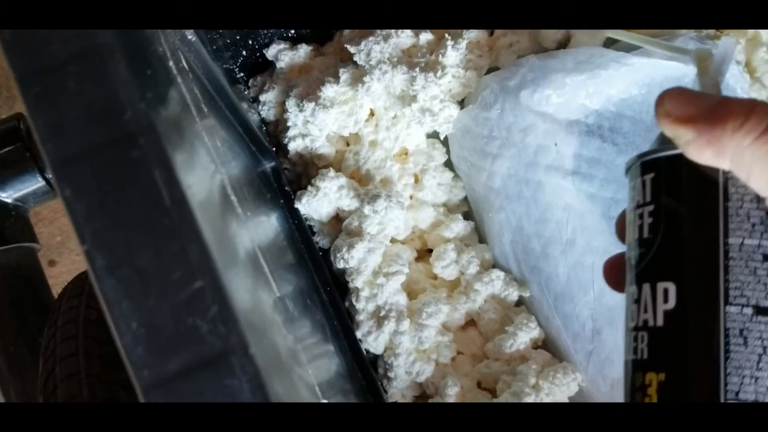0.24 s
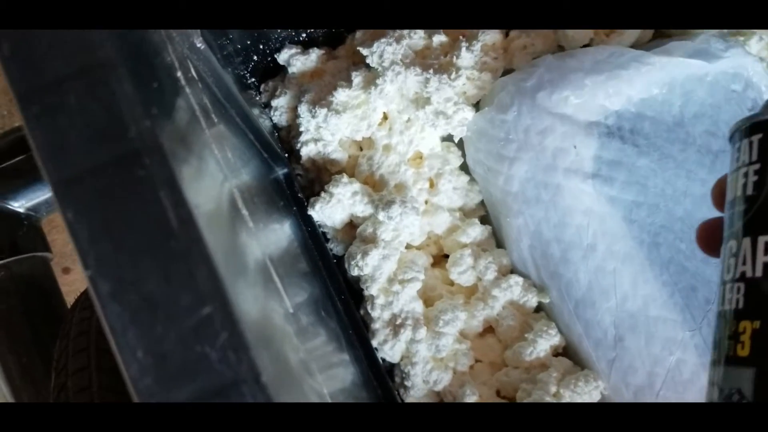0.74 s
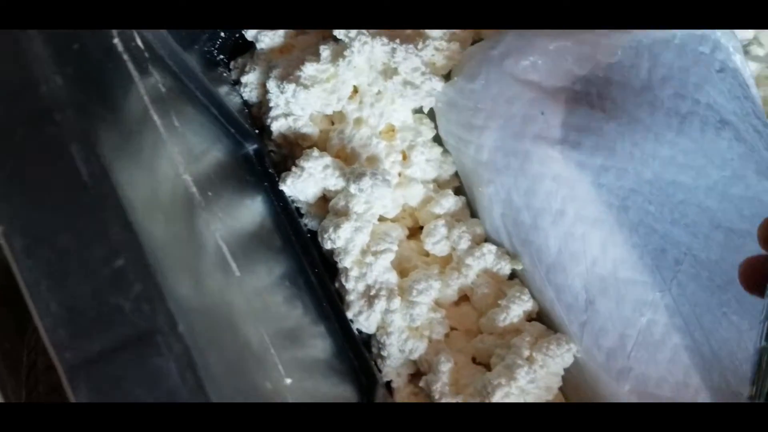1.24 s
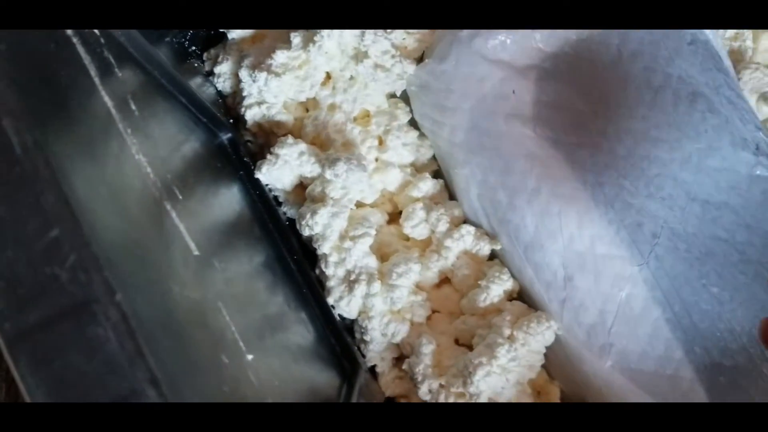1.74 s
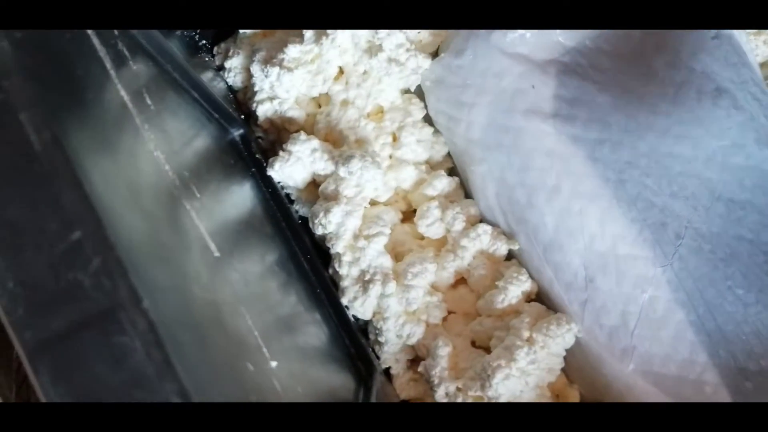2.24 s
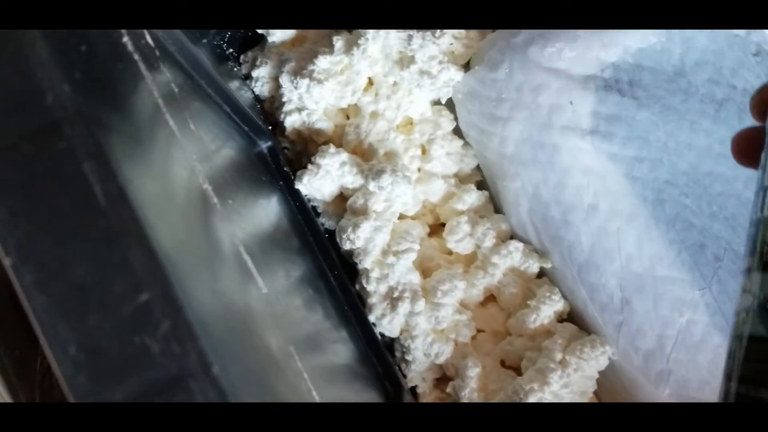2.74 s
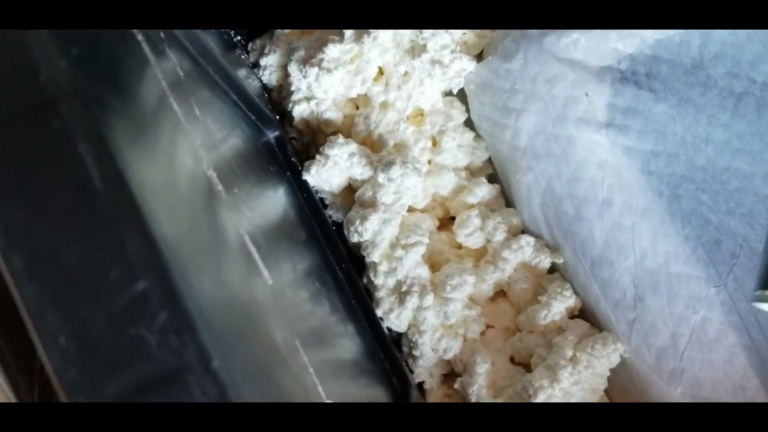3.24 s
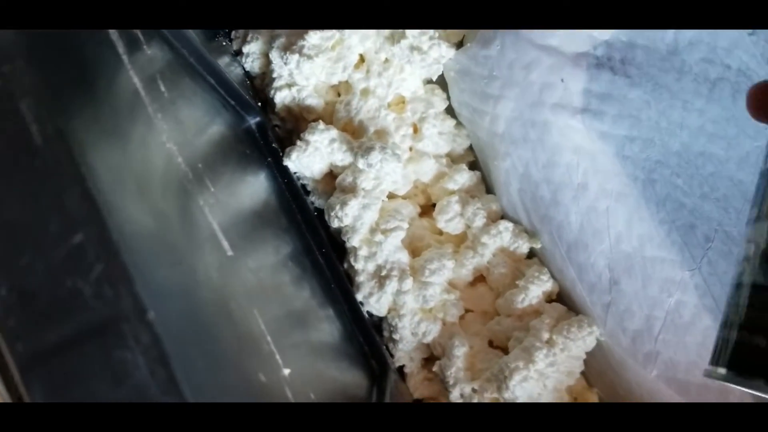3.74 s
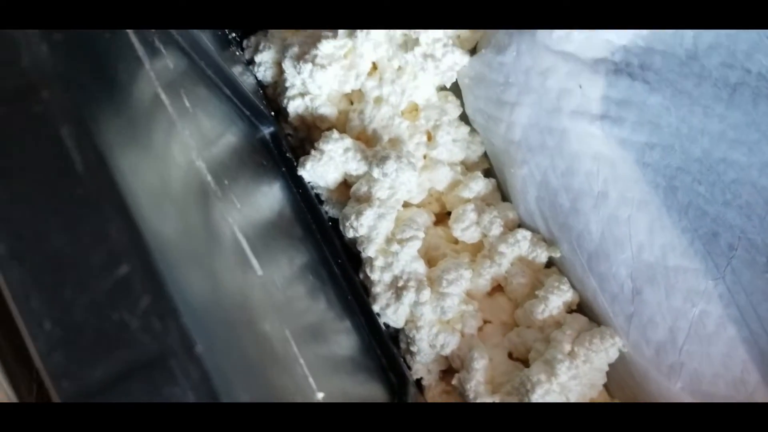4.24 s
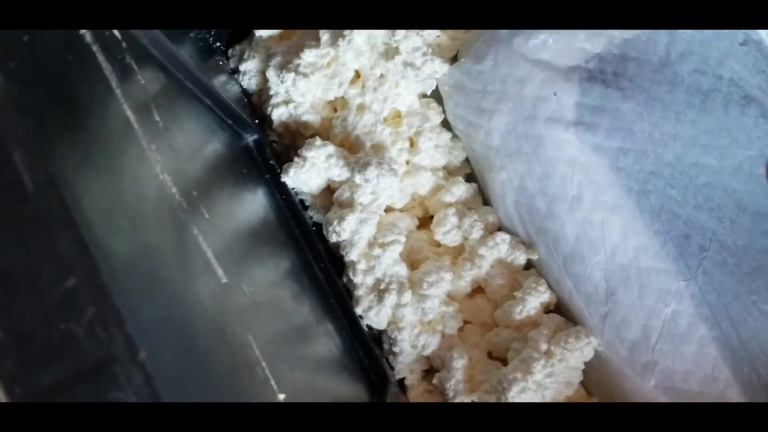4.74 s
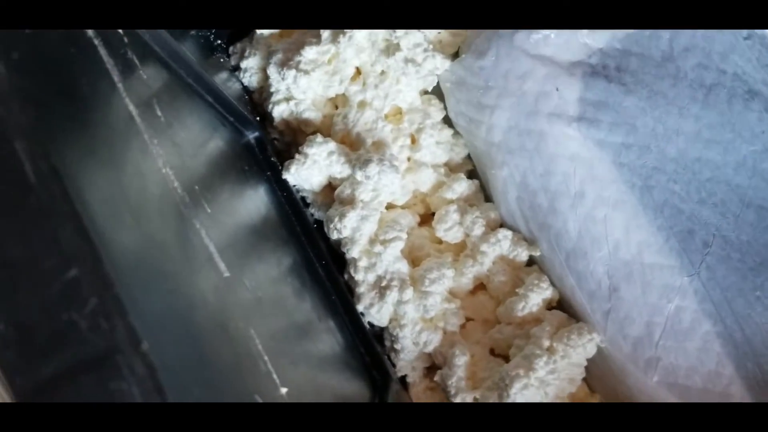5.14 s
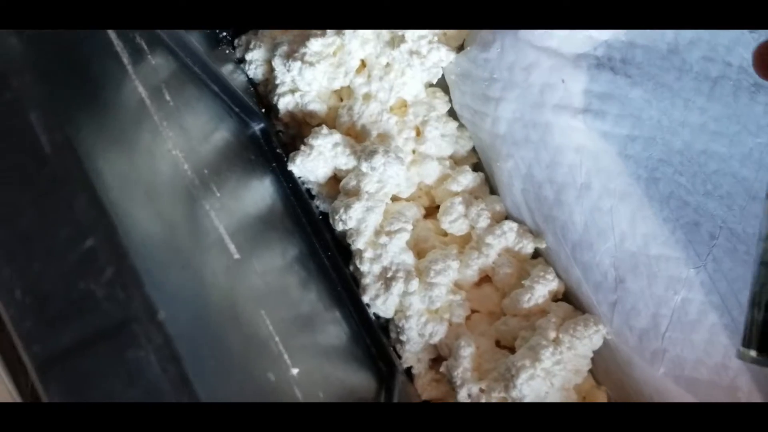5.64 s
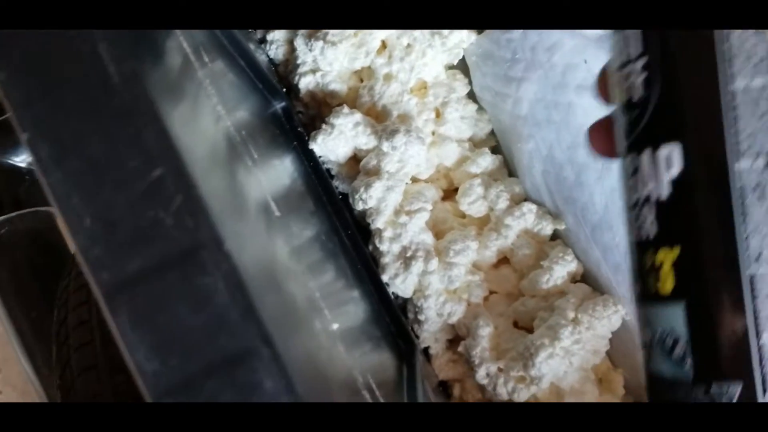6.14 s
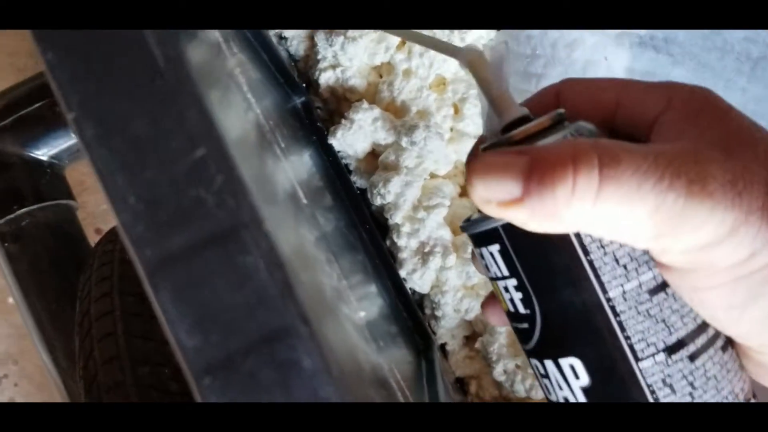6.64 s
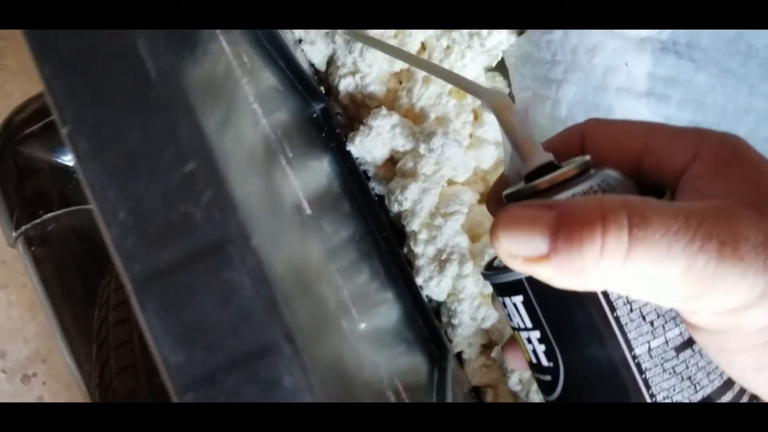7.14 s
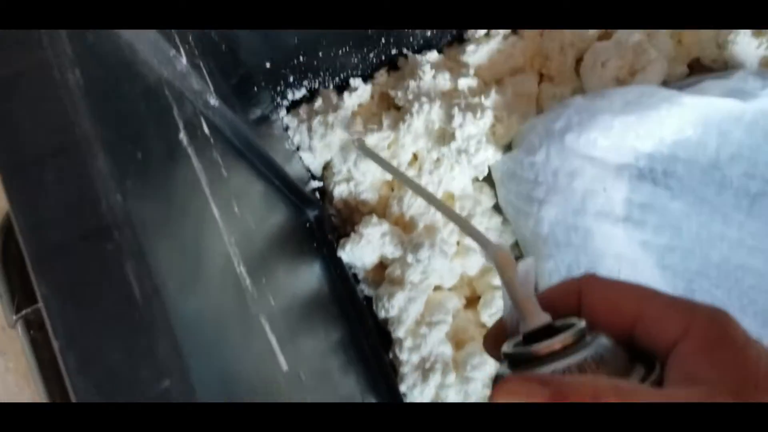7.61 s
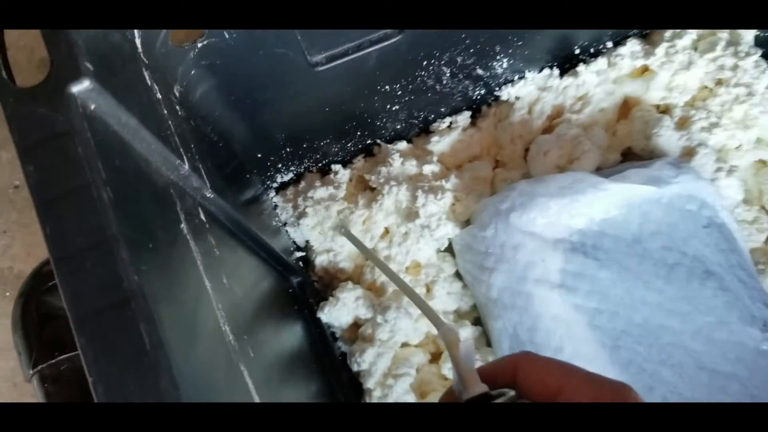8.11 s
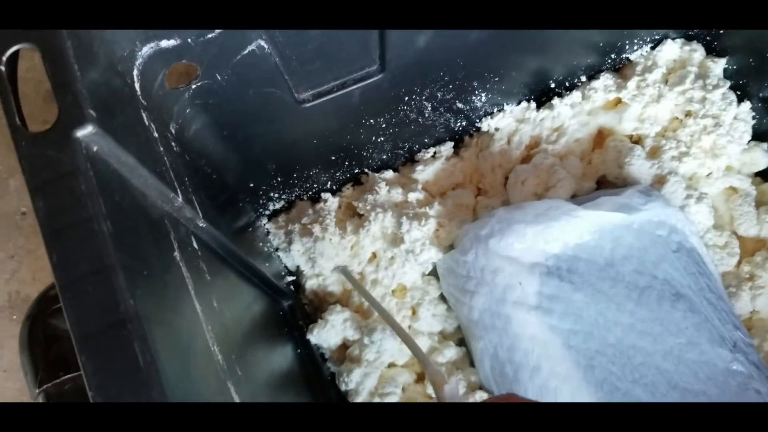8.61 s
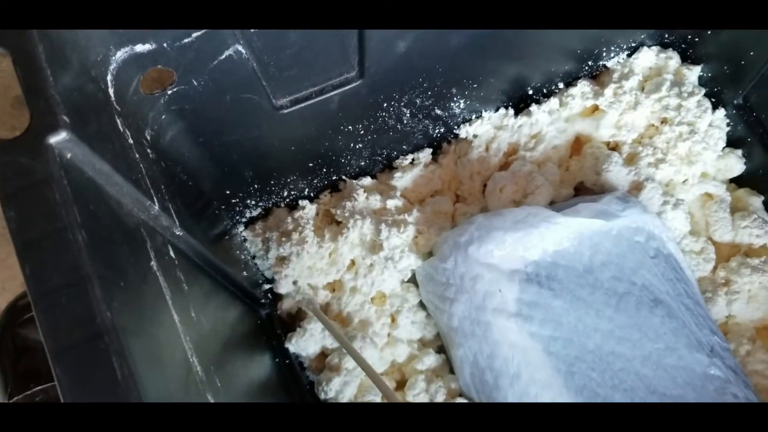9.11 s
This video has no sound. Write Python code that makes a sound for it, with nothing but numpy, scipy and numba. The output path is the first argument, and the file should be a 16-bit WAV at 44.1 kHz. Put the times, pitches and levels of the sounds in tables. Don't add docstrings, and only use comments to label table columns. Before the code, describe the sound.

Pressurised foam hisses from a thin straw close by, muffled and crackly at first, then brighter and more stuttering, over a faint workshop rumble.

```python
import sys
import numpy as np
from scipy import signal
from scipy.fft import rfft, irfft
from scipy.io import wavfile
from scipy.ndimage import uniform_filter1d, minimum_filter1d, map_coordinates
from numba import njit

SR = 44100
rng = np.random.default_rng(int(sys.argv[2]) if len(sys.argv) > 2 else 0)


def master_out(mix):
    frames = np.transpose(np.atleast_2d(mix))
    ceiling = np.clip(frames, -1, 1)
    pcm = np.round(ceiling * 32767).astype(np.int16)
    wavfile.write(sys.argv[1], SR, pcm)


def invert_db(x):
    u = np.asarray(x, float) / 20
    return 10 ** u


N = 413216


def in_time(rows):
    s, *columns = np.transpose(rows)
    return [np.interp(np.arange(N) / SR, s, column) for column in columns]


def rms_one(x):
    return x / np.sqrt(np.mean(x ** 2) + 1e-20)


def coloured(points, channels):
    hz = np.arange(N // 2 + 1) * SR / N + 1
    point_hz, point_db = np.transpose(points)
    gain = invert_db(np.interp(np.log(hz), np.log(point_hz), point_db))
    return hz, gain * rfft(rng.standard_normal((channels, N)))


def drift(rate):
    r = np.exp(-80 * np.pi * rate / SR)
    slow = signal.lfilter([1], [1, -2 * r, r * r], rng.standard_normal(N // 40 + 4002))
    slow = slow[4000:]
    return np.interp(np.arange(N) / 40, np.arange(len(slow)), rms_one(slow - slow.mean()))


def fade(clicks, seconds):
    return signal.lfilter([1], [1, -np.exp(-1 / (seconds * SR))], clicks + 1e-18)


def delayed(x, ms):
    return map_coordinates(x, [np.arange(N) - ms * SR / 1000], order=3, mode="mirror", prefilter=False)


@njit
def moving_peak(x, hz, r, sr):
    y = np.zeros(len(x))
    for i in range(2, len(x)):
        drive = (1 - r * r) / 2 * (x[i] - x[i - 2])
        y[i] = drive + 2 * r * np.cos(2 * np.pi * hz[i] / sr) * y[i - 1] - r * r * y[i - 2]
    return y


def resonate(x, hz, lift_db, width_hz):
    centre_hz = np.zeros(N) + hz
    return x + (invert_db(lift_db) - 1) * moving_peak(x, centre_hz, np.exp(-np.pi * width_hz / SR), SR)


def workshop():
    # (frequency [Hz], level [dB])
    rumble_colour = [(12, -54), (20, -26), (54, -14.5), (119, -9.5), (208, 7.5), (400, -0.5), (550, -69),
                     (920, -120)]
    # (time [s], hum level [dB])
    motor_level = [
        (1.3, -100),
        (1.45, -60),
        (3.3, -64),
        (3.5, -100),
    ]
    hz, noise = coloured(rumble_colour, channels=2)
    side_share = 0.18 * np.clip(hz / 350, .3, 1)
    mid, side = irfft(noise * [np.ones(len(hz)), side_share], N)
    hum_level = invert_db(in_time(motor_level)[0] + 0.59 * drift(4))
    motor_hz = 97.5 + 4.4 * drift(1.4)
    hum = hum_level * np.sin(2 * np.pi * np.cumsum(motor_hz) / SR)
    return invert_db(-44.5) * rms_one(mid + side * [[1], [-1]]) + np.sqrt(2) * hum


def walls(x, port):
    # (first, second, third echo lag [ms])
    room_lags_ms = [(7.3, 11.9, 17.1), (8.9, 13.7, 19.3)]
    thin = signal.sosfilt(signal.butter(2, 1200, "high", fs=SR, output="sos"), x)
    return invert_db(-16) * sum(delayed(thin, ms) * (-1) ** k for k, ms in enumerate(room_lags_ms[port]))


def paths(x, direct_ms):
    out = delayed(x, direct_ms)
    bright = signal.sosfilt(signal.butter(4, 2500, "high", fs=SR, output="sos"), x)
    for mean_ms in (.35, .62, 1.1, 2.3, 3.4, 5.2):
        lag_ms = direct_ms + mean_ms * (1 + 0.1227 * drift(0.898))
        out += 0.5 * rng.choice([-1, 1]) * delayed(bright, lag_ms)
    return out


def can_shade(x):
    # (time [s], centre [Hz], lift [dB])
    left_shade = [(0, 684, -16), (.5, 840, -8), (.9, 1080, 6), (1.2, 1300, 1), (2.5, 900, 3),
                  (2.8, 910, 0.5), (3.1, 1450, -1), (3.4, 1300, 2), (4.0, 900, 0.5), (4.35, 905, 3),
                  (4.7, 1000, -1), (5.5, 1000, 3), (5.75, 970, -10), (6.1, 735, -2.5), (6.3, 900, 1.5),
                  (6.6, 920, -1.5), (7.8, 1020, 1.5), (8.2, 1020, 1), (9.37, 1050, 0)]
    return resonate(x, *in_time(left_shade), width_hz=390)


def housing(left, right):
    # (time [s], centre [Hz], lift [dB])
    port_null = [(0, 1830, -8), (4.3, 1850, -7), (4.42, 2050, -22), (4.63, 2160, -20), (4.75, 1800, -12),
                 (5.35, 1820, -10), (5.55, 2200, -24), (5.7, 1850, -4), (6.4, 2000, -10), (6.55, 1940, -26),
                 (7.3, 1930, -26), (8.1, 1800, -18), (9.37, 1810, -12)]
    shared, apart = (left + right) / 2, (left - right) / 2
    shared = resonate(shared, *in_time(port_null), width_hz=280)
    case_hz, case_width_hz = 2244, 590
    shared = resonate(shared, case_hz, 2, case_width_hz)
    apart = resonate(apart, case_hz, -3, case_width_hz)
    return np.array([shared + apart, shared - apart])


def surges():
    # (time [s], lift [dB], half length [s])
    gas_surges = [(0.282, 1.5, 0.18), (0.46, -2.5, 0.08), (0.658, 5, 0.066), (0.91, 1, 0.061),
                  (1.043, -1.5, 0.027), (1.194, -2, 0.68), (1.437, 7, 0.041), (1.61, 4, 0.024),
                  (1.803, 3, 0.017), (1.998, -5.5, 0.035), (2.057, 2.5, 0.019), (2.373, 4.5, 0.085),
                  (2.65, 3.5, 0.043), (2.847, -3.5, 0.17), (3.107, -2.5, 0.071), (3.42, 1.5, 0.16),
                  (3.496, -3.5, 0.049), (3.723, 1, 0.032), (4.031, 2.5, 0.079), (4.195, -1.5, 0.026),
                  (4.588, 2, 0.12), (4.91, -2.5, 0.034), (5.08, 0, 0.13), (5.59, 1.5, 0.11),
                  (6.01, 0.5, 0.093), (6.668, -1, 0.025), (6.96, 0, 0.12), (7.235, 3, 0.67), (7.7, 1, 0.22),
                  (9.37, -14, 0.0062)]
    s, lift_db, half_s = np.transpose(gas_surges)
    coarse = np.arange(0, N + 100, 100) / SR
    bells = np.exp(-((coarse[:, None] - s) / half_s) ** 2)
    return np.interp(np.arange(N) / SR, coarse, bells @ lift_db)


def sputter(hiss_db):
    # (time [s], peak [dB], depth of the choke before it [dB])
    foam_slugs = [(0.132, -19, 2), (0.199, -5, -5), (0.2957, -15, 2), (0.3444, -7, -8), (0.4324, -5, -1),
                  (0.4658, -13, -3), (0.494, 0, 4), (0.5192, -12, -2), (0.622, -5, -3), (0.6679, -2, 1),
                  (0.814, -22, 4), (0.839, -8, 5), (0.8955, -20, 0), (1.037, -4, 0), (1.151, -19, 8),
                  (1.1842, -17, 3), (1.3423, -8, -1), (1.4082, -5, -6), (1.5988, -18, 1),
                  (1.7594, -12, 1), (1.7978, -8, 0), (2.0283, -9, -4), (2.129, -23, 6), (2.2124, -18, -1),
                  (2.2443, -10, 2), (2.3012, 1, -2), (2.3506, -11, 0), (2.413, -2, 2), (2.5262, -10, 2),
                  (2.5865, -12, -3), (2.6569, -5, -3), (2.834, -8, 4), (2.9786, 1.5, -7), (3.018, -20, 4),
                  (3.1113, -8, -3), (3.204, -4, 4), (3.291, 0, 4), (3.3543, -15, 3), (3.3907, -13, 1),
                  (3.4521, -8, -3), (3.5304, -3, -4), (3.694, 2, -1), (3.8, -15, 2), (3.9689, -14, -2),
                  (4.0387, -3, -5), (4.082, -4, -7), (4.2383, -13, 4), (4.308, -5, -6), (4.3371, -13, -3),
                  (4.5391, -15, 4), (4.6015, -10, -2), (4.6528, -9, -4), (4.696, -10, -1), (4.9552, -12, 2),
                  (5.0799, -12, 2), (5.1662, -10, -2), (5.192, 5.5, -2), (5.494, 2, -2), (5.53, -7, 3),
                  (5.6521, -14, 2), (5.683, -15.5, 2), (5.966, -2, 4), (6.0412, -7, 3), (6.069, -6, 7),
                  (6.102, -8, 2), (6.167, -9, -1), (6.2742, -10, 3), (6.3086, -11, 5), (6.343, -4, 12),
                  (6.516, -18, 7), (6.553, -9, -5), (6.6114, -22, 8), (6.729, -7, 9.5), (6.8154, -8, 3),
                  (6.9496, -16, 3), (7.0177, 0, 6), (7.0954, -15, 4), (7.147, -7, -2), (7.1821, -8, 1),
                  (7.226, 0, 4), (7.262, -9, -8), (7.299, -6, 4), (7.3477, -9, 2), (7.3742, -17, 6),
                  (7.448, -12, 6), (7.494, -4, 6), (7.537, -10, 12), (7.583, -20, 3), (7.6131, -16, 6),
                  (7.6595, -10, 9), (7.7172, -13, 8)]
    # (time [s], peak [dB], choke depth [dB])
    late_gasps = [(7.7889, -4, -2), (7.8123, -4, 11), (7.8587, -13, 4), (7.918, -4, 9), (7.973, 0, 4),
                  (8.0063, -4, 8), (8.0817, -19, 4), (8.108, -15, 7), (8.132, -13, 5), (8.153, -18, 6),
                  (8.2723, -22, 5), (8.307, -12, 5), (8.3361, -5, 5), (8.3905, -11, 5), (8.4104, -12, 2),
                  (8.426, -11, 16), (8.4653, -22, 10), (8.481, -22, 15), (8.508, -10, 7), (8.5277, -20, 12),
                  (8.562, -6, 25), (8.604, -18, 16), (8.6324, -15, 6), (8.649, -7, 12), (8.669, -9, 9),
                  (8.7437, -17, 8), (8.8011, -10, 5), (8.817, -2, -8), (8.86, -9, 10), (8.8879, -24, 2),
                  (8.908, -10, 10), (8.9472, -17, 19), (8.99, -8, 17), (9.015, -10, 10), (9.048, -16, 7),
                  (9.1106, -5, 11), (9.138, -6, 2), (9.1562, -13, 11), (9.197, -11, 4), (9.213, -15, 6),
                  (9.2356, -18, 4), (9.273, -18, 2), (9.323, -9, 32)]
    s, peak_db, choke_db = np.transpose(foam_slugs + late_gasps)
    emptying, chance = np.linspace(0.87, 1, N), rng.random((3, N))
    small = (chance[0] < 82 / SR) * emptying
    burst = small * 1.5 * (.5 + chance[1])
    choke = small * 0.5 * (.5 + chance[2])
    at = np.minimum((s * SR).astype(int), N - 1)
    crest_db, loudest_burst_db = 4.5, 8.5
    burst[at] = np.clip(peak_db - hiss_db[at] - crest_db, 0, loudest_burst_db)
    choke[at] = np.maximum(choke_db, 0)
    choke_s = .0042
    sag = fade(fade(choke[::-1], choke_s), choke_s)[::-1] * np.e / (choke_s * SR)
    flow = uniform_filter1d(fade(burst, 0.0044) - sag, size=190)
    flow = flow + .4 * uniform_filter1d(fade(burst, .001), size=45)
    flow = flow + 0.69 * drift(13) + 0.5 * emptying * drift(78) + 2.3 * drift(380)
    return flow - uniform_filter1d(flow, size=9000)


def cavities(x, buried, wall, surge_db):
    # (centre [Hz], lift far from wall [dB], lift near [dB], more when buried [dB], width [Hz])
    tray_rings = [
        (650, 3, 13.5, 2.5, 350),
        (1120, 4, 7.5, -7, 202),
        (1625, -10.5, 15, 7.5, 76),
    ]
    # (time [s], centre [Hz], lift [dB])
    foam_bounce = [(0, 650, -1.5), (.45, 855, -9.5), (.8, 930, -13), (1.4, 1120, -12), (1.8, 1070, -11.5),
                   (2.2, 1200, -15), (2.45, 1450, -13), (2.75, 1470, -12), (3.0, 950, 1), (4.3, 885, 1),
                   (4.6, 1210, -3), (5.0, 1450, -11), (5.6, 1370, -5), (6.15, 790, 1), (6.25, 2010, 2),
                   (6.55, 1820, -2.5), (7.1, 1700, -7.5), (8.1, 1810, 3), (9.37, 1830, 6)]
    # (time [s], centre [Hz], lift [dB])
    can_shadow = [(0, 2700, -15), (.6, 2870, -1), (.85, 2970, 7), (1.05, 3200, 10), (1.2, 2310, 8.5),
                  (1.4, 2320, 8.5), (1.65, 2120, 12), (1.8, 2220, 1), (2.1, 2600, 9), (2.5, 1980, -7),
                  (2.95, 2060, 11.5), (3.4, 2740, -5.5), (4.45, 2240, -8), (4.8, 3020, 9.5),
                  (5.4, 2300, -31), (5.9, 1890, 14), (6.08, 1600, 12.5), (6.27, 1190, 3.5),
                  (6.4, 2320, 7.5), (6.75, 3060, -11), (7.15, 2770, -16), (7.6, 2550, 0), (8.3, 2380, -14),
                  (9.37, 2650, -11)]
    # (time [s], centre [Hz], lift [dB])
    foam_pocket = [(0, 4100, 8.5), (.75, 4530, 5.5), (1.05, 3930, 1), (1.3, 4040, -5), (1.44, 4170, 1.5),
                   (1.6, 3700, -2), (1.8, 3700, 3), (2.2, 4470, 1.5), (2.5, 3780, 6), (2.85, 3170, 7),
                   (3.05, 3100, -4), (3.15, 6540, 4.5), (4.2, 5800, 9), (4.45, 3960, -1.5),
                   (5.2, 4770, 3.5), (5.7, 4160, 1), (5.95, 6750, 6.5), (6.749, 6460, 3.5),
                   (7.0, 4530, -0.5), (7.9, 3780, -3), (8.6, 4170, -2), (9.37, 4150, 2)]
    widths_hz = [670, 280, 930]
    for hz, far_db, near_db, sunk_db, width_hz in tray_rings:
        x = resonate(x, hz, far_db + (near_db - far_db) * wall + sunk_db * buried, width_hz)
    x = resonate(x, *in_time(foam_bounce), widths_hz[0])
    x = resonate(x, *in_time(can_shadow), widths_hz[1])
    pocket_hz, pocket_db = in_time(foam_pocket)
    return resonate(x, pocket_hz, pocket_db + surge_db, widths_hz[2])


def passing(x):
    # (time [s], centre [Hz],
    # lift [dB], half length [s])
    passing_tints = [(0.01, 1250, 8, 0.11), (0.01, 2630, 13, 0.043), (0.01, 5400, 11, 0.041),
                     (0.222, 6290, 6, 0.14), (0.493, 3700, 7, 0.18), (0.594, 1980, 8, 0.21),
                     (1.05, 4260, 14, 0.037), (1.174, 6460, 10, 0.38), (1.402, 4300, 4.5, 0.11),
                     (1.7, 3730, 9, 0.17), (1.72, 6290, 9, 0.2), (1.78, 2900, 3, 0.15), (2.264, 4040, 2.5, 0.15),
                     (2.314, 6450, 9, 0.044), (2.505, 3200, 8, 0.068), (2.79, 1900, 7, 0.18),
                     (2.803, 3580, 11, 0.1), (2.86, 6130, 6, 0.3), (2.91, 6840, 2, 0.056),
                     (3.046, 2750, 12, 0.046), (3.053, 3920, 13, 0.063), (3.275, 4000, 8, 0.13),
                     (3.463, 5000, 5, 0.25), (3.46, 6100, 15.5, 0.071), (3.65, 4030, 6, 0.24),
                     (3.812, 3340, 8.5, 0.059), (3.85, 3220, 3, 0.22), (3.868, 4520, 3.5, 0.14),
                     (4.24, 6840, 5, 0.25), (4.606, 4720, 7.5, 0.13), (4.719, 3230, 3.5, 0.3),
                     (5.2, 5840, 6, 0.069), (5.37, 3220, 5, 0.15), (5.715, 6670, 5.5, 0.41),
                     (5.722, 7300, 11, 0.16), (5.82, 3860, -13, 0.13), (6.223, 2630, 11, 0.089),
                     (6.332, 4720, 14.5, 0.033), (6.764, 7300, 11.5, 0.51), (6.93, 5780, 11, 0.21),
                     (7.022, 3700, 8, 0.19), (7.197, 5100, 6.5, 0.14), (7.71, 4100, -2, 0.11),
                     (7.94, 2900, 5.5, 0.2), (7.972, 3830, 7, 0.12), (8.36, 5430, 4, 0.07), (8.37, 4700, 6, 0.13),
                     (8.56, 4160, -7, 0.045), (9.07, 3530, 7.5, 0.073), (9.36, 3580, -3, 0.093),
                     (0.19, 3300, -7, 0.39), (0.19, 3750, -12, 0.093), (0.7, 3780, -12, 0.1),
               (0.914, 1580, -8, 0.13), (1.11, 5740, -8, 0.076), (1.59, 5000, -8, 0.2),
               (1.51, 1630, -7, 0.25), (1.55, 2780, -12, 0.12), (1.86, 4100, -15, 0.27),
               (2.1, 2840, -4.5, 0.084), (2.26, 5030, -8, 0.2), (2.325, 3330, -11, 0.24),
               (2.413, 6040, -10, 0.064), (2.68, 3960, -12, 0.19), (2.89, 4680, -1.5, 0.37),
               (3.47, 3040, -17, 0.049), (3.62, 5800, -5, 0.17), (3.65, 5400, -9, 0.16),
               (3.84, 6800, -4, 0.062), (4.05, 3360, -11, 0.088), (4.42, 2780, -11, 0.15),
               (4.45, 5700, -11, 0.22), (5.06, 6040, -11, 0.14), (5.12, 3620, -3, 0.27),
               (5.2, 7450, -13, 0.16), (5.57, 3160, -10, 0.12), (5.894, 3100, -21, 0.11),
               (5.9, 4860, -14, 0.084), (6.17, 1570, -15, 0.18), (8.0, 4400, -6, 0.13),
               (8.38, 3150, -15, 0.88), (8.93, 4200, -4, 0.057), (9.17, 4540, -1, 0.14),
               (9.21, 7240, -10, 0.2), (9.36, 1810, -5, 0.23), (9.36, 4220, -1, 0.1)]
    out, r = x.copy(), np.exp(-np.pi * 260 / SR)
    for s, hz, lift_db, half_s in passing_tints:
        start, stop = max(int((s - 2 * half_s) * SR), 0), min(int((s + 2 * half_s) * SR), N)
        i = np.arange(start, stop)
        poles = [1, -2 * r * np.cos(2 * np.pi * hz / SR), r * r]
        ring = signal.lfilter([(1 - r * r) / 2, 0, (r * r - 1) / 2], poles, out[i])
        bell = np.exp(-((i / SR - s) / half_s) ** 2)
        out[i] += (invert_db(lift_db * bell) - 1) * ring
    return out


def jet():
    # (time [s], flow [dB], tip buried in foam [0-1], tip near the tray wall [0-1])
    jet_moves = [(0, -37, 0.6, 0.62), (.9, -35, 0.87, 0.64), (1.9, -35.5, 0.67, 0.69), (2.22, -36, 0.39, 1),
                 (2.3, -33, 0.95, 0.54), (2.95, -22.5, 0.48, 0.26), (3.15, -29, 0.22, 0.94),
                 (3.45, -29, 0.28, 0.88), (3.6, -22, 0.14, 0.43), (4.15, -27, 0.03, 0.86),
                 (4.45, -23, 0.17, 0.17), (5.0, -24, 0.1, 0.49), (5.8, -27.5, 0.09, 0.62),
                 (6.2, -32, 0.04, 0.88), (6.9, -31.5, 0.12, 0.91), (8.05, -27.5, 0.15, 0.54),
                 (8.25, -29.5, 0.14, 0.42), (9.37, -28.5, 0.23, 0.24)]
    # (frequency [Hz], level per Hz [dB])
    jet_colour = [(180, -41), (300, -12.5), (637, -8.5), (1500, -8), (4140, -3.5), (8350, -7), (11900, 4),
                  (16000, -5.5)]
    band_edges_hz = [1400, 3000, 8000]
    band_db = [-39.5, -39, -24.5, -19]
    flow_share = [0.86, 0.082, 1.0, 0.4]
    buried_db = [6.5, 15.5, 10, -64]
    wall_db = [4.1, 7.6, 0.1, 0.1]
    surge_share = [.1, .2, 1.01, 1.2]
    sputter_share = [0.45, .7, 1.016, 1.2]
    flow_db, buried, wall = in_time(jet_moves)
    surge_db = surges()
    mean_flow_db = -26
    levels_db = []
    for k in range(4):
        level_db = band_db[k] + flow_share[k] * (flow_db - mean_flow_db)
        level_db = level_db + buried_db[k] * buried + wall_db[k] * wall
        levels_db.append(level_db + surge_share[k] * surge_db)
    sputter_db = sputter(levels_db[2])
    hz, noise = coloured(jet_colour, channels=1)
    below = [0] + [1 / (1 + (hz / edge) ** 4) for edge in band_edges_hz] + [1]
    out = 0
    for low, high, level_db, share in zip(below, below[1:], levels_db, sputter_share):
        band = rms_one(irfft(noise[0] * (high - low), N))
        out = out + band * invert_db(level_db + share * (sputter_db + 1.45 * drift(57)))
    return cavities(out, buried, wall, surge_db)


def scene():
    # (time [s], left port lag [ms], tray echo lag [ms], echo strength [1], left minus right [dB])
    tip_paths = [(0, -0.15, 1.7, 0.24, 2.5), (.3, 0.13, 1.53, 0.32, 2), (.55, 0.24, 2, 0.082, 1.5),
                 (1.0, 0.2, 1.78, 0.16, 0), (1.5, 0.24, 1.3, 0.2, 2.5), (1.8, 0.17, 1.55, 0.26, 1),
                 (2.3, 0.15, 1.47, 0.48, 0), (2.75, 0.14, 1.72, 0.17, 0.1), (3.0, 0.11, 1.66, 0.16, 0.6),
                 (4.3, 0.1, 1.78, 0.28, 0), (4.5, 0.065, 1.7, 0.25, 0), (5.0, 0.13, 1.45, 0.22, 1),
                 (5.5, 0.1, 1.77, 0.49, 0), (5.75, -0.1, 1.82, 0.32, 1.5), (5.92, -0.318, 1.9, 0.22, 1),
                 (6.1, -0.414, 2, 0.13, 3), (6.23, -0.23, 1.6, 0.19, -0.3), (6.5, -0.2, 1.5, 0.22, 0.5),
                 (7.5, -0.22, 1.45, 0.068, 0.5), (8.3, -0.26, 1.29, 0.22, 2.5),
                 (9.37, -0.25, 1.18, 0.27, 2.5)]
    lag_ms, tray_ms, echo, pan_db = in_time(tip_paths)
    hiss = passing(jet())
    dull = signal.lfilter([.4], [1, -.6], hiss)
    hiss = hiss + echo * delayed(dull, tray_ms)
    shaded = can_shade(hiss)
    left = (paths(shaded, lag_ms / 2) + walls(shaded, port=0)) * invert_db(pan_db / 2)
    right = (paths(hiss, -lag_ms / 2) + walls(hiss, port=1)) * invert_db(-pan_db / 2)
    return housing(left, right) + workshop()


def roll_off(x):
    return signal.sosfilt(signal.butter(12, 16600, fs=SR, output="sos"), x)


def record(dry):
    heard = signal.sosfilt(signal.butter(2, 30, "high", fs=SR, output="sos"), dry)
    heard = heard * 0.6
    limit = .8
    peak = -minimum_filter1d(-np.abs(heard).max(axis=0), size=301)
    heard = heard * uniform_filter1d(limit / np.maximum(peak, limit), size=151)
    heard = signal.sosfilt(signal.cheby2(20, 60, 16150, fs=SR, output="sos"), heard)
    return roll_off(heard)


dry = scene()
out = record(dry)
master_out(out)
```